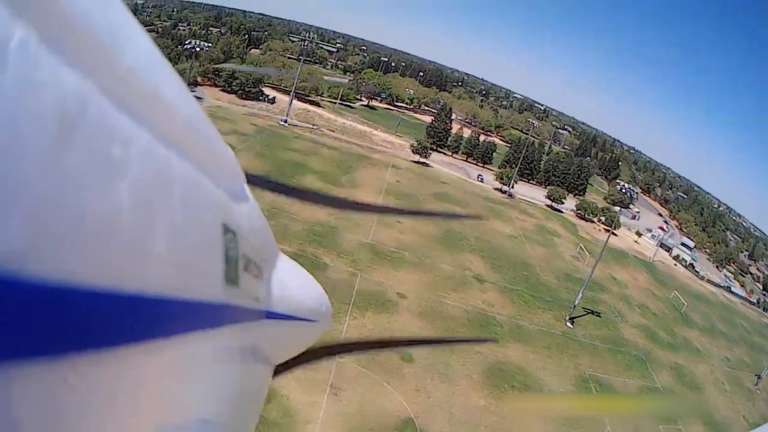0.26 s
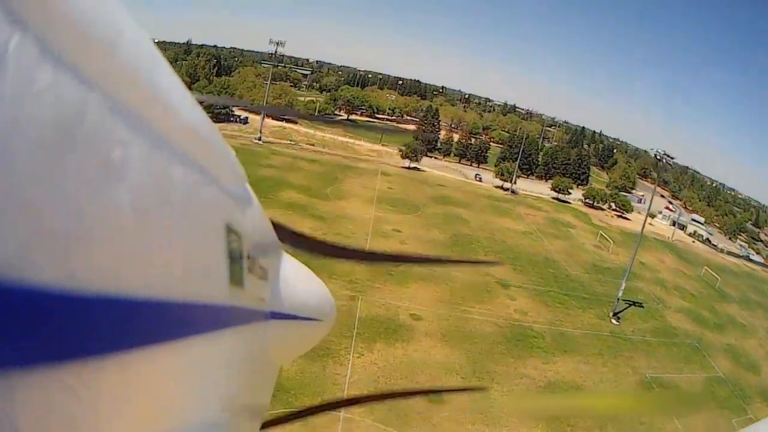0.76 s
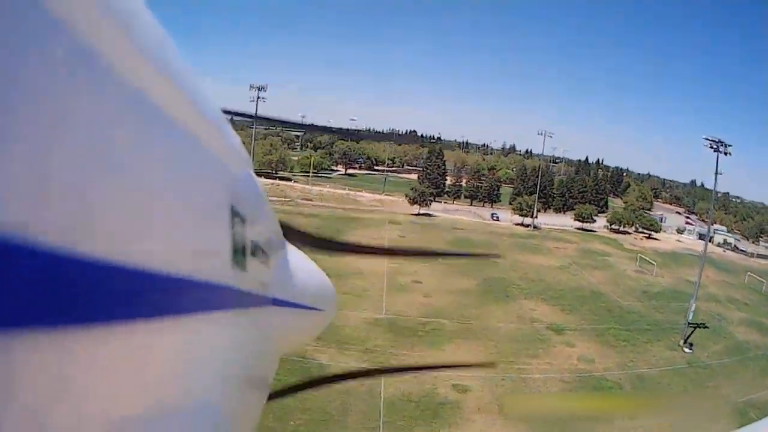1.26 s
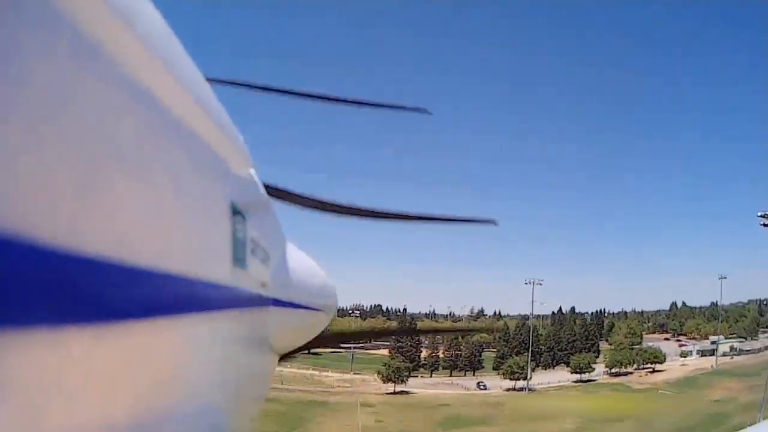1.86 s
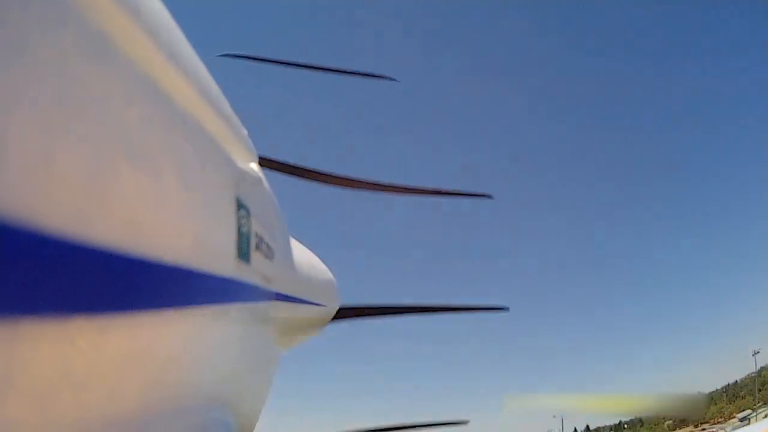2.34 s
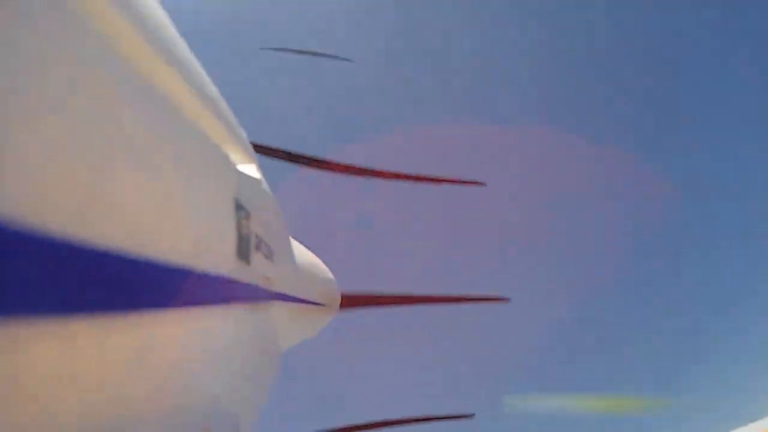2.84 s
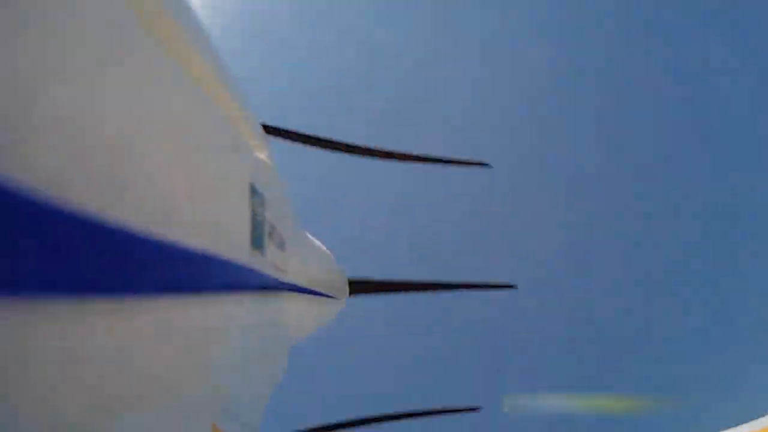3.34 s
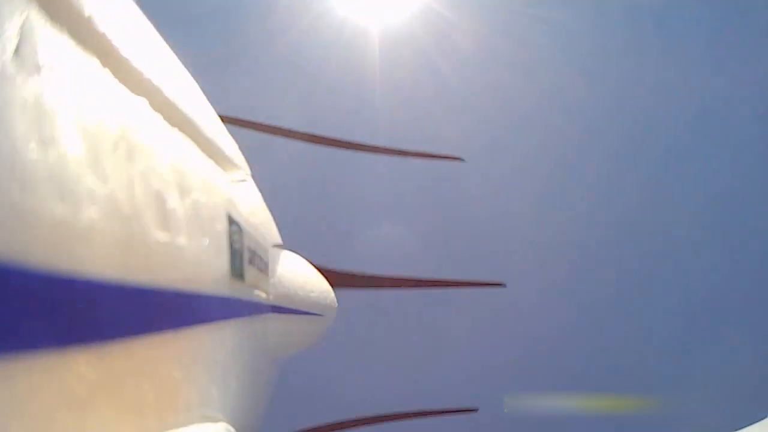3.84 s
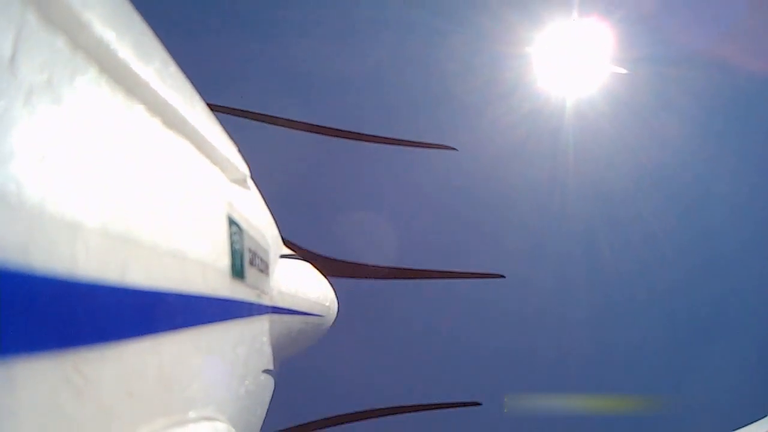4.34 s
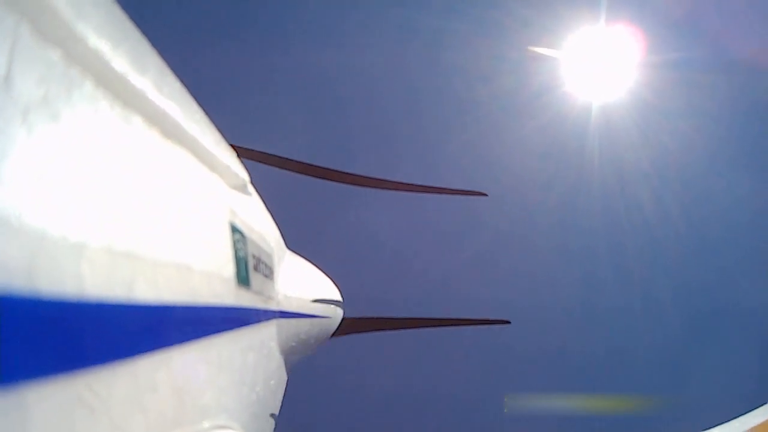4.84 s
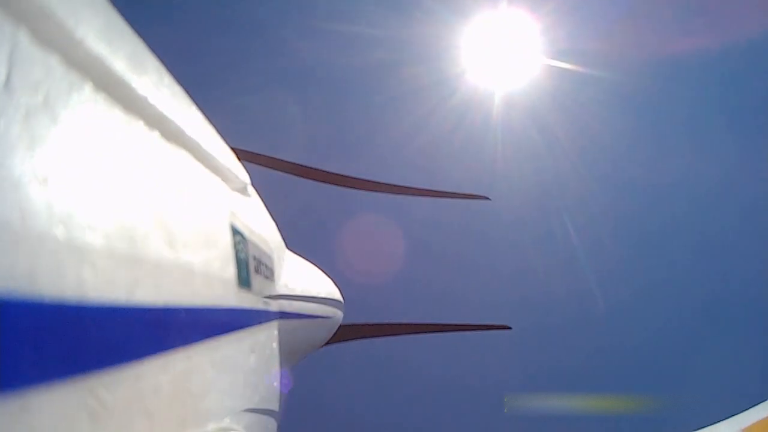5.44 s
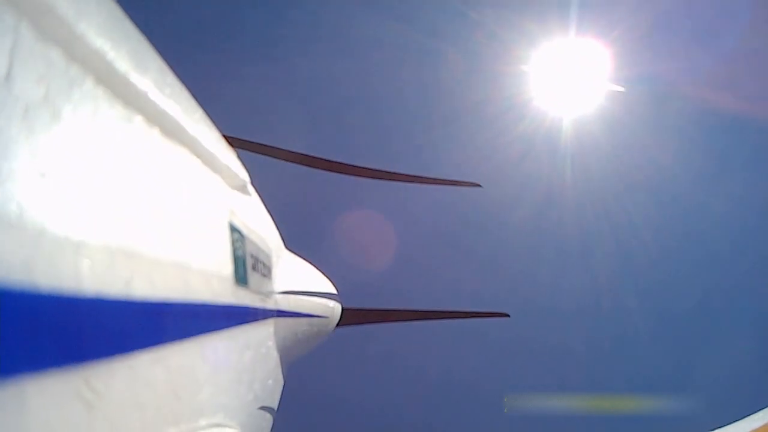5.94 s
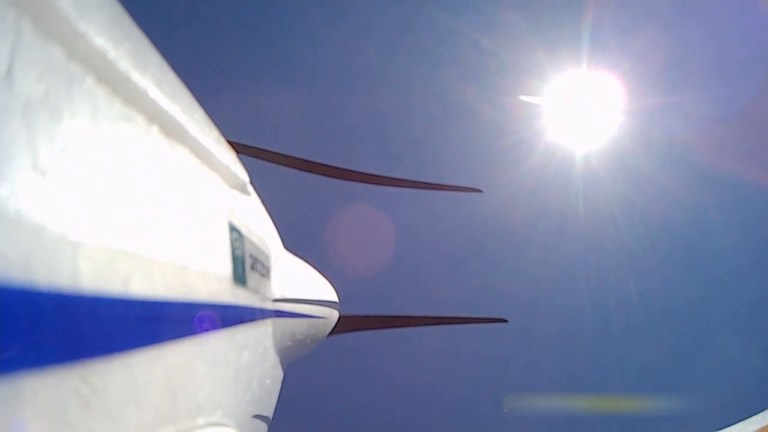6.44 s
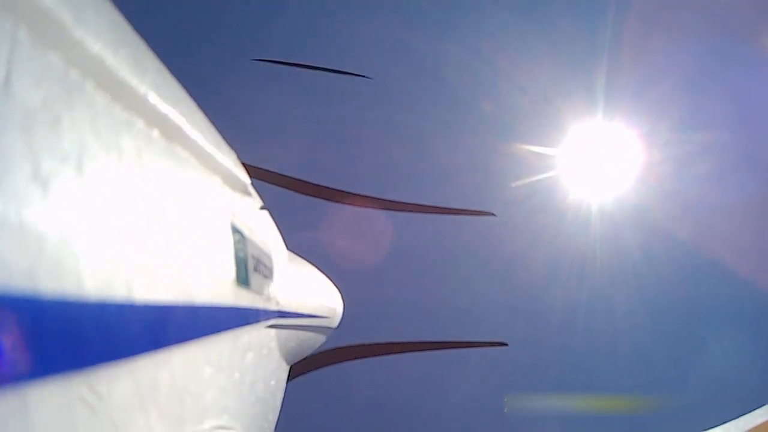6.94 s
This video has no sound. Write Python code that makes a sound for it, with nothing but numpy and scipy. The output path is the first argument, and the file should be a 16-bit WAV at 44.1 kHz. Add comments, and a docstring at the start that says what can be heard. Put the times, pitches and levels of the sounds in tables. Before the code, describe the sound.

Close wind rush and hiss with low fluttering thumps, then a thin electric propeller whine rising quickly and gradually sagging while the airflow fades.

```python
"""Model aircraft in a climb

On board a small electric model aircraft that pulls up into a climb and loses airspeed.
The two-bladed propeller and fourteen-pole motor whine as sines on multiples of the shaft speed.
Slipstream is shaped noise that rushes over the microphone housing, excites its resonances and hisses.
Buffeting shakes a low mode of the airframe with noise, thumps and a wavering hum, over a faint drone."""
import sys
import numpy as np
from scipy import signal
from scipy.fft import rfft, irfft, next_fast_len
from scipy.io import wavfile
from scipy.ndimage import uniform_filter1d

SR = 44100
rng = np.random.default_rng(int(sys.argv[2]) if len(sys.argv) > 2 else 0)


def unload_audio(sound):
    """Save the sound as a 16-bit wav file, at the path given as the first command line argument."""
    columns = np.transpose(np.atleast_2d(sound))
    # keep every value between -1 and 1, then stretch to whole-number steps
    steps = np.round(np.clip(columns, -1, 1) * 32767)
    wavfile.write(sys.argv[1], SR, steps.astype(np.int16))


N = 317079


def from_db(db):
    """Turn decibels into an amplitude factor."""
    return 10 ** (np.asarray(db) / 20)


def rms_one(x):
    """Scale to an average (RMS) strength of 1."""
    return x / np.sqrt(np.mean(x ** 2) + 1e-20)


def in_time(rows):
    """Draw straight lines between the rows of a table, one curve for each column after the time."""
    seconds, *columns = np.transpose(rows)
    t = np.arange(N) / SR
    return [np.interp(t, seconds, column) for column in columns]


def drift(rate_hz):
    """Slow random wandering of spread 1: noise through two equal one-pole low-pass filters."""
    r = np.exp(-2 * np.pi * rate_hz / SR)
    noise = rng.standard_normal(N + SR)
    settled = signal.lfilter([1], [1, -2 * r, r * r], noise)[SR:]  # drop the filter's first second
    return rms_one(settled)


def coloured(x, spectrum, modes=()):
    """Filter by a spectrum lifted at each resonance, with no sound ahead of its cause."""
    size = 2 * next_fast_len(N // 2 + SR // 4)
    hz = np.arange(1, size // 2 + 2) * SR / size
    point_hz, point_db = np.transpose(spectrum)
    gain = from_db(np.interp(np.log(hz), np.log(point_hz), point_db, left=-70, right=-70))
    for centre_hz, width_hz, lift_db in modes:
        offset = 2 * (hz - centre_hz) / width_hz
        gain = gain * (1 + (from_db(lift_db) - 1) / (1 + offset ** 2))
    cepstrum = irfft(np.log(rms_one(gain)), size)  # rms_one: white noise keeps its level
    cepstrum[1:size // 2] *= 2      # folding gives the minimum phase
    cepstrum[size // 2 + 1:] = 0
    response = np.exp(rfft(cepstrum))
    return irfft(rfft(x, size) * response, size)[:N]


def clicks(events, boost_db):
    """A sudden knock is a single-sample impulse, boosted because later filtering weakens it."""
    out = np.zeros(N)
    seconds, db = np.transpose(events)
    out[(seconds * SR).astype(int)] = from_db(db + boost_db)
    return out


# How fast the shaft spins. Each row: time in seconds, shaft turns per second.
SHAFT_SPEED = [(0.0, 133.3), (0.15, 128.95), (0.3, 125.8), (0.6, 124.9), (0.92, 123.0), (1.0, 124.7),
               (1.2, 137.5), (1.3, 139.6), (1.55, 141.0), (1.7, 140.1), (2.0, 139.55), (2.45, 135.2),
               (2.75, 133.8), (2.92, 132.4), (3.2, 128.34), (3.65, 124.95), (4.1, 123.3), (4.7, 121.55),
               (5.1, 121.05), (5.55, 120.24), (5.9, 120.08), (7.19, 119.72)]


def shaft_speed():
    """The inertia of the spinning parts rounds off changes of speed; a running mean does this."""
    turns, = in_time(SHAFT_SPEED)
    return uniform_filter1d(turns, size=SR // 16, mode="nearest")


def shaft_angle(turns):
    """Adding up the speed gives the shaft angle in radians; the speed jitters slightly."""
    jittery_turns = turns * (1 + 0.00034 * drift(7.9))
    return 2 * np.pi * np.cumsum(jittery_turns) / SR


# The propeller's own tones. Each row: time in seconds, blade tone in dB, unbalance tone in dB.
PROPELLER = [(0.0, -65, -49), (0.3, -47, -48.5), (0.88, -42.5, -44.5), (1.2, -51, -47.5), (1.4, -77, -46),
             (2.16, -65, -45), (2.6, -52.5, -41), (3.2, -34.5, -40), (3.7, -45.5, -47.5),
             (4.18, -46, -53.5), (4.4, -52, -51), (4.52, -37, -52), (4.64, -45, -53), (4.78, -36.5, -55),
             (4.86, -47, -52), (4.96, -36.5, -55), (5.05, -46, -53), (5.4, -46, -54), (5.8, -41, -56),
             (6.18, -48.5, -54.5), (6.38, -40.5, -54), (6.62, -53, -51), (6.78, -51, -51), (6.9, -45, -52),
             (7.19, -45.5, -53)]


def propeller_levels():
    """Two blades sound at twice the shaft speed, unbalance at once the shaft speed."""
    blade_db, unbalance_db = in_time(PROPELLER)
    return {2: blade_db, 1: unbalance_db}


# Pull of the motor, light until the throttle opens. Each row: time in seconds, load in dB.
MOTOR_LOAD = [(0.0, -9), (1.08, -12), (1.2, 0), (7.19, 0)]
# Tones of the motor's magnet poles. Each row: multiple of shaft speed, share of the load swing.
POLE_TONES = [(14, 1.0), (28, 0.1), (42, 1.8)]
# Strength of a pole tone at full load, by its pitch. Each row: pitch in Hz, level in dB.
MOUNT_RESPONSE = [(1670, -38.5), (1740, -36.5), (1900, -38.5), (1960, -33), (3350, -49.5), (3410, -49),
                  (3480, -56), (3580, -61), (3860, -56), (3930, -74), (5030, -48), (5120, -52.5),
                  (5230, -50.5), (5340, -46), (5620, -48), (5700, -55), (5800, -63), (5900, -65)]


def pole_levels(turns):
    """Each pole tone grows with the load and rises or falls as its pitch crosses the mount response."""
    load_db, = in_time(MOTOR_LOAD)
    hz, db = np.transpose(MOUNT_RESPONSE)
    return {multiple: np.interp(multiple * turns, hz, db) + share * load_db
            for multiple, share in POLE_TONES}


# Weaker tones. Each row: multiple of shaft speed, multiple of the main tone whose level it follows,
# level in dB relative to that tone (negative is weaker).
SIDE_TONES = [(4, 2, -20), (11, 28, 1), (12, 28, -2), (13, 14, -11), (15, 14, -10), (16, 14, -14),
              (24, 28, -5), (40, 42, -18), (41, 42, -19), (44, 42, -19)]


def whine(angle, levels_db, flutter_db):
    """Propeller and motor tones are sines locked to the shaft; each flutters a little in strength."""
    main_tones = [(multiple, multiple, 0) for multiple in levels_db]
    out = np.zeros(N)
    for multiple, leader, relative_db in main_tones + SIDE_TONES:
        level_db = levels_db[leader] + relative_db + flutter_db * drift(10.7)
        phase = rng.uniform(0, 2 * np.pi)
        out += np.sqrt(2) * from_db(level_db) * np.sin(multiple * angle + phase)
    return out


# Strength of the slipstream. Each row: time in seconds, rush level in dB.
SLIPSTREAM = [(0.0, -25.5), (0.5, -25.5), (1.08, -25.5), (1.6, -24.5), (2.32, -26), (2.58, -25),
              (2.66, -29.5), (2.84, -29), (2.89, -26), (3.08, -26.5), (3.2, -32.5), (3.34, -31),
              (3.52, -27.5), (3.82, -31), (5.1, -31.5), (5.26, -33), (5.45, -38), (5.75, -35.5), (6.4, -33),
              (6.6, -35), (7.19, -36.5)]
# The hiss grows with the rush. Each row: rush level in dB, hiss level in dB.
HISS_LAW = [(-36.5, -52), (-32.5, -47), (-24, -36.5)]
# The hiss heeds quick gusts only in part, otherwise the mean flow over this span in seconds.
GUST_SHARE, AIRSPEED_S = 0.47, 1.0


def slipstream_levels():
    """Airflow sets the rush directly and the hiss mostly through its mean; both in dB."""
    rush_db, = in_time(SLIPSTREAM)
    mean_db = uniform_filter1d(rush_db, size=int(AIRSPEED_S * SR), mode="nearest")
    heeded_db = mean_db + GUST_SHARE * (rush_db - mean_db)
    return rush_db, np.interp(heeded_db, *np.transpose(HISS_LAW))


WAKE_PER_BLADE, WAKE_PER_TURN = 0.16, 0.1   # depth of the pulsing in the slipstream, 1 is full


def turbulence(angle, gust_db, eddy_db, eddy_rate_hz):
    """Rough air is noise that swells with gusts and eddies and pulses with each blade and turn."""
    wake = 1 + WAKE_PER_BLADE * np.cos(2 * angle) + WAKE_PER_TURN * np.cos(angle)
    swelling = from_db(gust_db + eddy_db * drift(eddy_rate_hz))
    return rms_one(rng.standard_normal(N) * wake * swelling)


def crackle(per_s, size_db):
    """Small eddies burst at random as single impulses of uneven strength and either sign."""
    extra_db = 2.47 * np.minimum(rng.exponential(1, N), 4)
    sizes = from_db(size_db + extra_db) * rng.choice([-1, 1], N)
    return sizes * (rng.random(N) < per_s / SR)


def bursts(events, gain_db, decay_s):
    """A sharp eddy is a sudden puff of noise that dies in a few milliseconds."""
    fade = np.exp(-1 / (decay_s * SR))
    envelope = signal.lfilter([1], [1, -fade], clicks(events, gain_db) + 1e-18)
    return envelope * rng.standard_normal(N)


# Sharp eddies on the housing. Each row: time in seconds, peak in dB before gain and filtering.
POPS = [(0.381, -6), (0.4359, -1.5), (0.4908, -1.5), (0.554, -1), (0.6699, -4.5), (0.7173, -4),
        (0.7881, -6), (0.8765, -10), (1.0068, -2), (1.4147, -9), (1.6295, -11), (2.3301, -10), (2.4947, -7),
        (2.5406, -4), (2.8803, -6.5), (3.472, -9)]
# Balance of the rush. Each row: frequency in Hz, relative strength in dB per Hz.
RUSH_SPECTRUM = [(400, -27), (550, -23), (1000, -13.5), (1600, -21.5), (2300, -14), (3100, -11.5),
                 (3600, -23), (4000, -43)]
# Resonances of the microphone housing. Each row: centre in Hz, width in Hz, lift in dB.
HOUSING = [(1301, 160, 8.5), (1370, 236, 13), (1954, 182, 17.5), (2603, 293, 11.5), (2995, 98, 4)]


def rush(angle, gust, rush_db):
    """Air tumbling over the microphone housing drives its resonances with noise, crackle and pops."""
    flow = turbulence(angle, 0.63 * gust, eddy_db=0.94, eddy_rate_hz=110)
    flow = flow + crackle(per_s=72, size_db=11)
    pops = bursts(POPS, gain_db=-13.5, decay_s=0.0041)
    return coloured(from_db(rush_db) * flow + pops, RUSH_SPECTRUM, HOUSING)


# Balance of the hiss. Each row: frequency in Hz, relative strength in dB per Hz.
HISS_SPECTRUM = [(3200, -10), (3700, -4.5), (4700, -3.5), (5400, -2.5), (5850, -13.5), (6340, 0),
                 (6900, -6), (8200, -5.5), (8850, -2.5), (9700, -6.5), (11000, 0), (12800, -2.5),
                 (14000, -5)]
# Narrow peaks in the hiss. Each row: centre in Hz, width in Hz, lift in dB.
HISS_PEAKS = [(4000, 83, 2), (4465, 70, 5.5)]


def hiss(angle, gust, hiss_db):
    """The bright part of the slipstream is noise with its own eddies but the same gusts."""
    flow = turbulence(angle, 0.59 * gust, eddy_db=-0.74, eddy_rate_hz=150)
    return coloured(from_db(hiss_db) * flow, HISS_SPECTRUM, HISS_PEAKS)


# Strength of the shaking. Each row: time in seconds, level in dB.
BUFFETING = [(0.0, -39.5), (0.3, -49), (0.62, -43.5), (1.0, -37), (2.2, -39.5), (2.54, -38), (3.4, -40.5),
             (3.75, -49), (3.86, -53), (7.19, -55)]
# Jolts of the airframe. Each row: time in seconds, peak in dB before boost and filtering.
THUMPS = [(0.198, -36), (0.448, -32.5), (0.6, -39), (0.728, -40), (0.84, -34), (0.922, -36), (1.15, -35),
          (1.5, -48), (4.339, -39)]
# Balance of the shaking. Each row: frequency in Hz, relative strength in dB per Hz.
BUFFET_SPECTRUM = [(20, -23), (60, -19), (100, -15.5), (200, -8), (260, -14.5), (300, -30), (350, -128)]
# Low mode of the airframe. Each row: centre in Hz, width in Hz, lift in dB.
AIRFRAME = [(240, 51, 11.5)]


def buffet():
    """Unsteady noise and sudden jolts shake the airframe, which favours its low mode."""
    level_db, = in_time(BUFFETING)
    shake = from_db(level_db + 2.6 * drift(7.7)) * rng.standard_normal(N)
    return coloured(shake + clicks(THUMPS, boost_db=28), BUFFET_SPECTRUM, AIRFRAME)


# Swells of the hum. Each row: time of the top in seconds, level of this swell in dB, length in seconds.
HUM_SWELLS = [(0.0, -40, .12), (0.26, -36, 0.11), (0.52, -34.5, 0.051), (0.62, -34.5, 0.029),
              (0.76, -32.5, 0.11), (0.94, -32, 0.038), (1.06, -34.5, 0.23), (1.5, -31.5, .08),
              (1.7, -34.5, 0.37), (2.08, -37.5, 0.22), (2.34, -38, .14), (2.54, -33, 0.047),
              (2.93, -36.5, 0.034), (3.07, -36, 0.091), (3.4, -42, 0.083), (3.58, -39, .1),
              (3.78, -38, 0.038)]


def swells(events):
    """Bell-shaped rises and falls of the hum are added as powers; the sum is in dB."""
    t = np.arange(N) / SR
    power = np.zeros(N)
    for top_s, db, length_s in events:
        bell = np.exp(-(2 * (t - top_s) / length_s) ** 2)
        power += from_db(2 * db) * bell   # twice the dB turns amplitude into power
    return 10 * np.log10(power + 1e-9)


HUM_HZ = 236.4   # middle pitch


def hum(level_db, waver_hz):
    """The shaken airframe rings on its low mode; the pitch wavers as fresh knocks upset the phase."""
    cycles = np.cumsum(HUM_HZ + waver_hz * drift(12.3)) / SR
    return np.sqrt(2) * from_db(level_db) * np.sin(2 * np.pi * cycles)


# Strength of the faint low noise. Each row: time in seconds, level in dB.
DRONE_LEVEL = [(0, -51.5), (.4, -56.5), (3.2, -56), (3.7, -54), (7.19, -57.5)]
# Balance of the faint low noise. Each row: frequency in Hz, relative strength in dB per Hz.
DRONE_SPECTRUM = [(260, -2), (330, -1), (450, -0.5), (650, -0.5), (900, -2)]


def drone():
    """A faint low background is filtered noise of slowly changing level."""
    level_db, = in_time(DRONE_LEVEL)
    return coloured(from_db(level_db) * rng.standard_normal(N), DRONE_SPECTRUM)


def scene():
    """The shaft drives the whine and pulses the slipstream; buffeting, hum and drone are added."""
    turns = shaft_speed()
    angle = shaft_angle(turns)
    motor = whine(angle, propeller_levels() | pole_levels(turns), flutter_db=0.78)
    rush_db, hiss_db = slipstream_levels()
    gust = drift(36)      # one gustiness for the whole slipstream
    air = rush(angle, gust, rush_db) + hiss(angle, gust, hiss_db)
    airframe = buffet() + hum(swells(HUM_SWELLS), waver_hz=6.18)
    return (motor + air + airframe + drone())[None]


CUTOFF_HZ = 12800


def record(dry):
    """A steep low-pass filter cuts off the top of the sound."""
    low_pass = signal.ellip(14, 0.3, 62, CUTOFF_HZ, fs=SR, output="sos")  # ripple, stop depth in dB
    return signal.sosfilt(low_pass, dry)


dry = scene()
out = record(dry)
unload_audio(out)
```